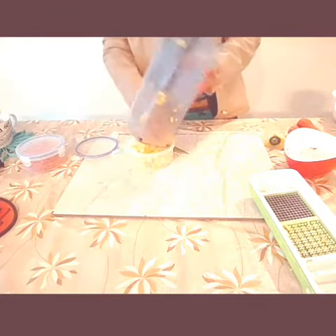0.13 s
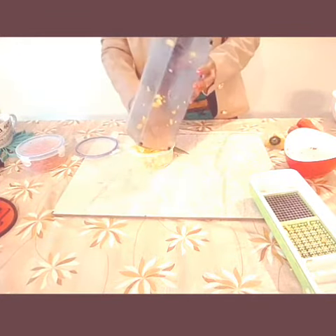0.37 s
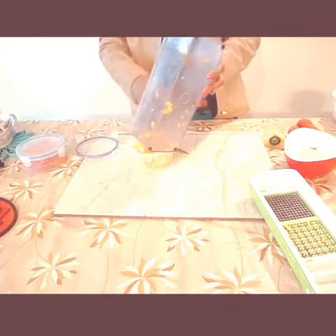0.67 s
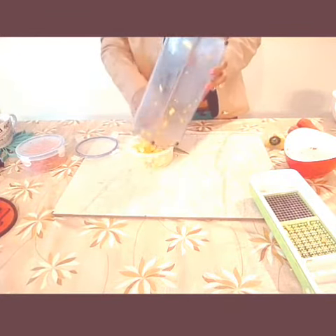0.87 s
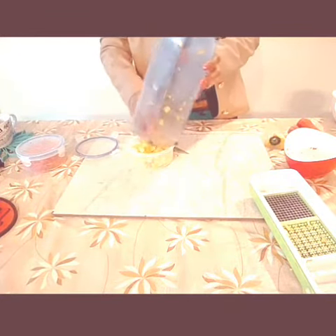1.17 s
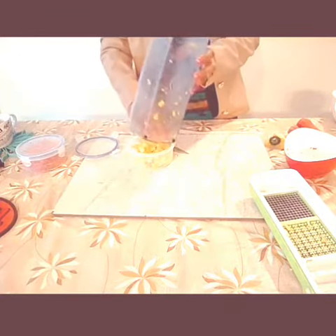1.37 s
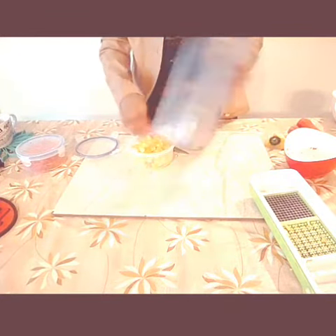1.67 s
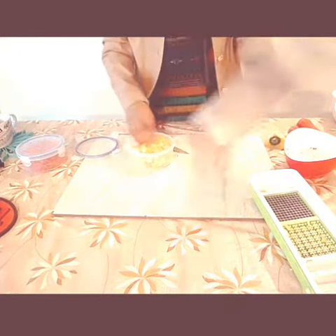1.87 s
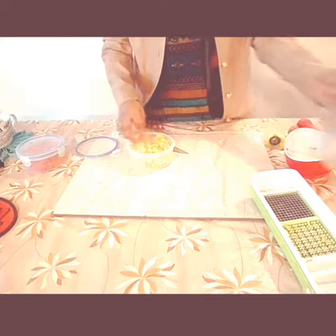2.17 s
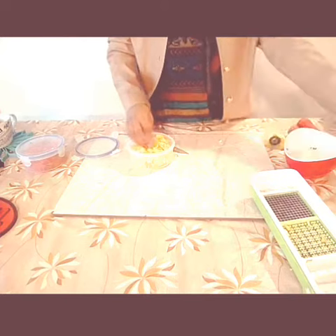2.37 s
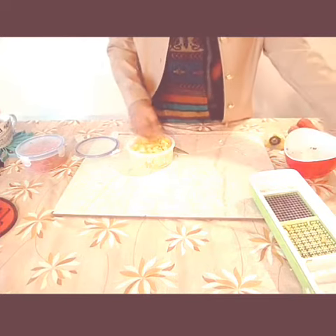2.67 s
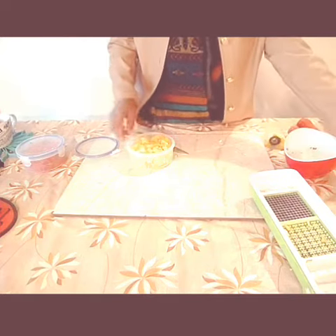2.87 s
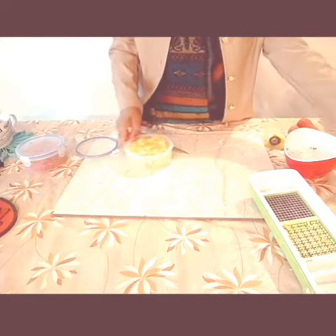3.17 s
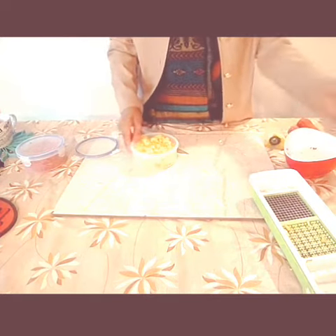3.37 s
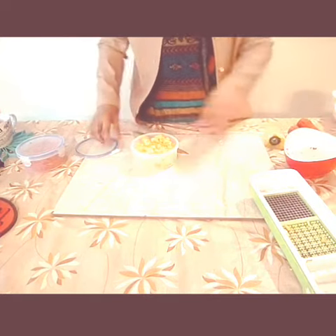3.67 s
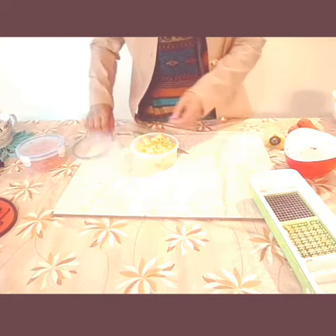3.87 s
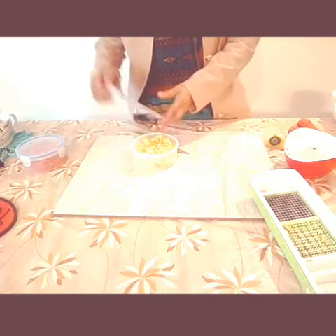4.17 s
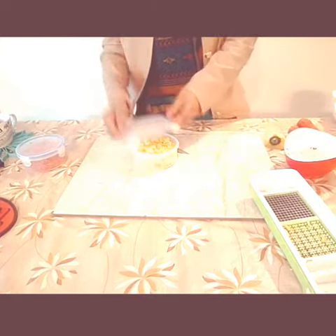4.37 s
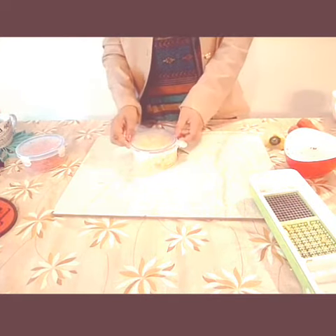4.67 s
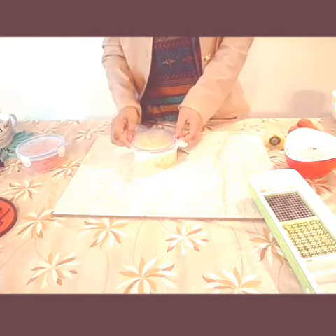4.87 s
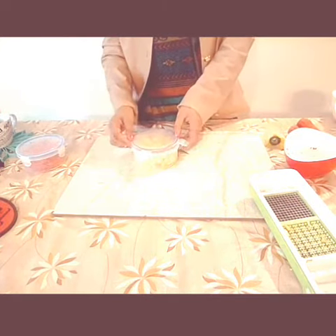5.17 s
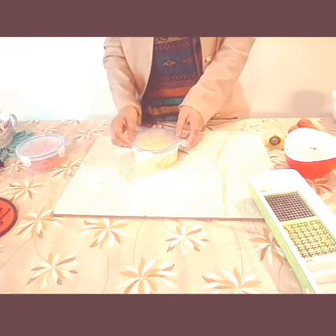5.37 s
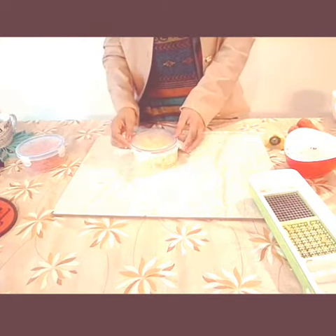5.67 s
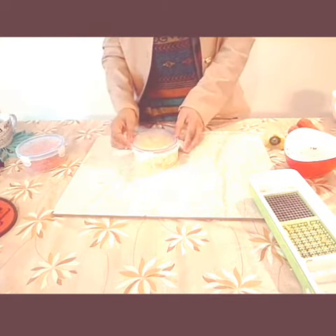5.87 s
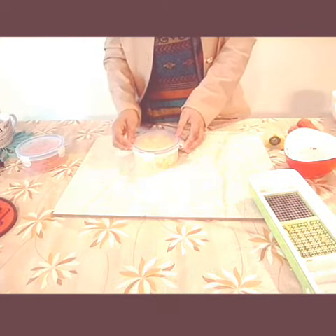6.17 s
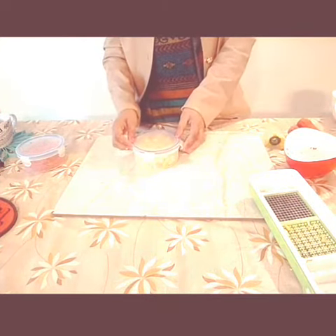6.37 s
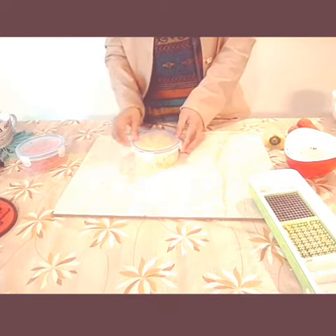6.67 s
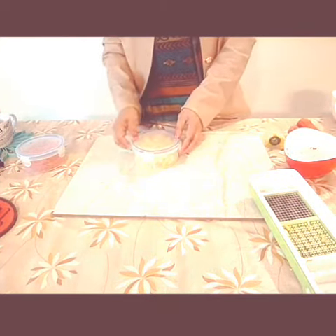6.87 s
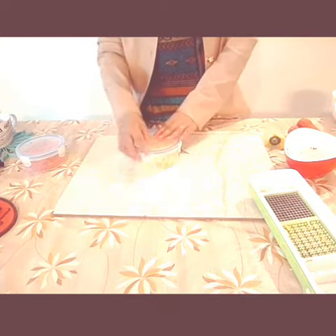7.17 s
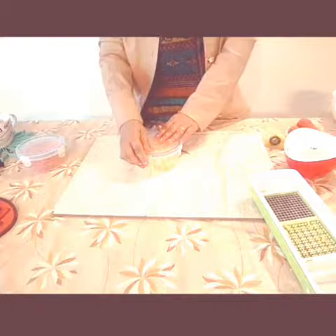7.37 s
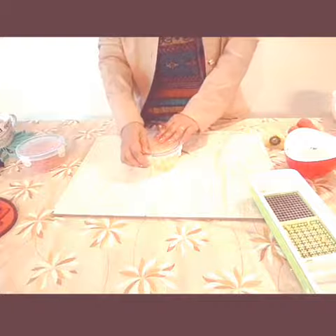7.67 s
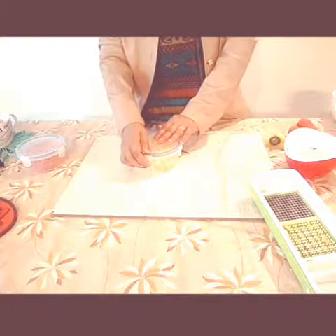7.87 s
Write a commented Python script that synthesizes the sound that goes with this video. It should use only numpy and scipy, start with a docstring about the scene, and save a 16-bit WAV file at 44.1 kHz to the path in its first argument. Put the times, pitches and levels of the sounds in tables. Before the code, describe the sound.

Steady hiss and faint hum. A hollow plastic knock, then softer taps as chopped food is emptied; a low bump and a quick clattering set-down follow. Lid knocks, finger rubs and thin faint rings lead to bright, sharp latch snaps, the loudest sounds. Close microphone, lively small kitchen, distant crow and one tiny bird chirp.

```python
"""Over steady hum and hiss, hands knock a plastic tray empty over a small tub, set it aside, seat a lid, snap latches.
The place is a bare kitchen, the microphone some 0.6 m from the hands: each blow is a short contact that rings
a few damped modes, answered by echoes and a noise tail from the walls. Slipping food and fingers are dense tiny
impulses; thin rings are trembling single modes. Far outside a crow caws (harmonics and noise through a throat)
and a small bird chirps (a wandering whistle mixed with narrow noise)."""
import sys
import numpy as np
from scipy import signal
from scipy.io import wavfile
from scipy.ndimage import uniform_filter1d

SR = 44100
rng = np.random.default_rng(int(sys.argv[2]) if len(sys.argv) > 2 else 0)


def materialize(psi):
    """Save the field psi as 16-bit PCM at rate SR to the path in sys.argv[1].

    A 1-D psi becomes a single channel; in a 2-D psi each row is a channel.
    """
    bounded = np.clip(np.atleast_2d(psi).T, -1, 1)
    quanta = np.round(bounded * 32767).astype(np.int16)
    wavfile.write(sys.argv[1], SR, quanta)


N = 353329

# Levels of sources are given ahead of the kitchen, the microphone and the mix in scene().
# Hiss spectrum, only its shape counts: (f/Hz, density/dB per Hz)
HISS_SPECTRUM = [(15, -43), (25, -7), (39, -14.5), (124, 6), (232, -10.5), (304, -0.5), (422, -9.5),
                 (669, -11), (1640, -14.5), (1980, -17), (5880, -20), (8370, -33.5), (13300, -34.5),
                 (14800, -27), (15600, -23.5), (15900, -77)]
HISS_DB = -65.5  # RMS
HUM_HZ, HUM_WIDTH_HZ, HUM_DB = 312.5, 36, -70.5  # RMS
# Kitchen reverberation: (f/Hz, t60/s)
WALL_DECAY = [(100, 0.44), (260, 0.58), (700, 0.48), (1840, 0.53), (4850, 0.47), (12800, 0.34)]
# First reflections, against a tail of unit energy: (t/ms, level/dB)
FIRST_ECHOES = [(2.5, -12.5), (5.5, -10), (9.5, -7.5), (12, -8), (17, -15), (24, -23.5)]
TRAVEL_S = .0018  # from the hands to the microphone
BASS_DB_PER_OCTAVE = -5  # the lower the struck spot rings, the more bass the blow carries

# Blows, five tables: (t/s, peak level/dB, favoured f/Hz, treble/dB, walls/dB)
# Hand taps on the tray
TRAY_TAPS = [(0.134, -23.5, 636, -10, 1.9), (0.733, -48.5, 465, -1.5, 5.5), (0.952, -32, 600, -18.5, 8),
             (1.085, -42.5, 1220, -44, 4.5), (1.15, -41.5, 1100, -31, 1), (1.277, -33.5, 556, -4, 1.5),
             (1.399, -44, 590, 6, 6.5), (1.488, -51.5, 1110, -15, 1.5)]
# A dull bump on the table
TABLE_THUMPS = [(0.77, -50.5, 150, -30, -1), (2.829, -36, 300, -28, -4), (2.843, -28.5, 113, -33, 1)]
# The tray meets the shelf
TRAY_SET_DOWN = [(3.17, -43, 900, -19, -5), (3.178, -16.5, 1280, -5.5, 0.5), (3.3505, -21, 3120, 3, 1.5),
                 (3.361, -16.5, 1360, -12.5, 5), (3.3658, -12, 1770, 2, -5)]
# The lid is lifted and seated
LID_TAPS = [(3.766, -39, 1900, -9.5, 0), (3.988, -39.5, 1240, -1, 7), (4.509, -13.5, 1090, -5.5, -1.5),
            (4.682, -15, 940, -10, -4.5), (4.927, -36, 1120, -10, -3.5), (4.959, -39, 425, -6.5, 5),
            (5.133, -37.5, 300, -9.5, -6), (5.177, -44.5, 790, -9.5, 9.5), (5.455, -46, 294, -6, 6),
            (5.489, -18.5, 642, -9.5, -4), (5.934, -41.5, 780, -30, 0), (5.947, -24.5, 1590, -9.5, -1.9),
            (5.964, -25.5, 627, -22, -4.5), (6.091, -35.5, 680, -14, -1), (6.142, -31, 280, -29, -2),
            (6.2915, -47, 393, -8.5, -6)]
# Latches creak and snap
LATCH_SNAPS = [(6.654, -40.5, 1530, -13, -3), (6.694, -29.5, 1800, 0.5, -3), (6.759, -9.5, 6380, -4, 4),
               (6.768, 0.3, 6460, 5.5, -3), (7.347, -43, 1840, -7, -4.5), (7.684, -27.5, 4040, -1.5, -13),
               (7.6945, -6.5, 3860, 14, -15), (7.705, -1.6, 6600, 2, 0.2), (7.788, -5.7, 6550, 1.5, 5)]

# Damped modes of the struck things, five tables: (f/Hz, width/Hz, level/dB)
# Plastic tray
TRAY_MODES = [(394, 37, -1), (540, 16, 3), (620, 53, -0.5), (811, 140, -2.5), (1100, 105, -2.5),
              (1343, 90, -7), (1610, 67, -7), (2112, 63, -5.5), (2400, 35, -11), (3000, 1600, -18.5),
              (3900, 1500, -17), (5260, 4100, -28.5)]
# Table
TABLE_MODES = [(113, 7, 10.5), (151, 81, 6.5), (300, 78, -9), (500, 26, -9)]
# Shelf
SHELF_MODES = [(131, 160, 4), (455, 134, -2.5), (920, 210, -4), (1220, 170, -11.5), (1940, 460, -10),
               (2700, 1150, -12.5), (4580, 1100, -20)]
# Lid
LID_MODES = [(321, 27, -2), (567, 87, -3), (850, 49, -3), (1114, 560, 1), (1643, 120, 1),
             (2700, 1430, -3.5), (4300, 680, -4), (6340, 1900, -31)]
# Latches
LATCH_MODES = [(300, 200, -10), (800, 330, -22), (2020, 530, 12.5), (2676, 1000, 12), (4700, 2500, 5.5),
               (9160, 2040, -3.5), (15000, 1000, -8.5)]

# Diced food tumbling down the tray: (t/s, length/s, level/dB)
FOOD_TUMBLES = [(0.48, 0.069, -71), (1.003, 0.33, -68.5), (1.45, 0.074, -69.5)]
# Caws outside: (t/s, level/dB, rasp against voice/dB)
CAWS = [(1.639, -70, -10), (2.09, -71.5, -9), (2.58, -67.5, -8), (3.011, -69.5, -7.5), (3.53, -66.5, -10.5),
        (4.1, -67.5, -10), (7.2, -70, -14)]
# Crow's throat, voiced part: (f/Hz, width/Hz, level/dB)
THROAT = [(1532, 110, 0.5), (1620, 490, 1), (1930, 480, -10)]
# Crow's upper throat, rasp: (f/Hz, width/Hz, level/dB)
UPPER_THROAT = [(4550, 340, 1), (5390, 2400, 10)]
CAW_S, CAW_HZ = .28, 458  # length; top of the pitch arch
# Chirps smeared by distance: (t/s, length/s, level/dB, f/Hz, width/Hz)
CHIRPS = [(2.395, 0.15, -74, 3660, 336)]
# Fingers and food sliding on plastic: (t/s, length/s, level/dB)
SLIDE_STROKES = [(3.534, 0.41, -70.5), (3.976, 0.051, -59), (4.906, 0.09, -58), (5.093, 0.12, -64),
                 (5.24, 0.16, -74.5), (5.924, 0.084, -56.5), (6.08, 0.056, -61), (6.676, 0.19, -62),
                 (7.125, 0.32, -71)]
# Sliding spectrum, only its shape counts: (f/Hz, density/dB per Hz)
SLIDE_SPECTRUM = [(120, -12.5), (200, -11), (640, -15.5), (774, -12), (1830, -10.5), (2180, -30.5),
                  (2810, -13.5), (5670, -20), (9000, -39), (11700, -71.5), (19800, -120)]
SLIDE_TILT_DB = -5.5  # at 3500 Hz, mirrored at 500 Hz
# Thin wavering rings, of the lid and perhaps a bracelet: (t/s, level before decay/dB, f/Hz, t60/s)
TINKLE_RINGS = [(3.69, -66, 3420, 0.4), (3.779, -64.5, 2400, 1.8), (3.988, -46.5, 1190, 0.43),
                (4.99, -65, 3580, 0.99), (5.03, -66, 2777, 1.9), (5.088, -69, 4153, 0.81),
                (5.63, -71.5, 2700, 0.46), (5.96, -66, 1570, 0.52)]

# Microphone response: (f/Hz, level/dB)
MICROPHONE = [(30, -16), (70, -2), (150, -6.5), (4000, 1.5), (6400, 5.5), (7600, -4), (10000, -6.5),
              (13500, -14), (15000, -4.5), (16500, -15)]
LIMIT_DB, SQUEEZE = -24.5, 0.51  # gain control threshold; dB taken off per dB above it
HELD_LEVEL_FALL_DB_PER_S = 110.5
EDGE_HZ = 17000  # band limit


def amp(db):
    """Amplitude factor for a level in dB."""
    return 10 ** (np.asarray(db) / 20)


def evened(x):
    """The same signal at unit RMS."""
    return x / np.sqrt(np.mean(x ** 2) + 1e-20)


def read(points, hz):
    """Curve through (f, value) points, straight over log frequency and level past its ends."""
    f, value = np.transpose(points)
    return np.interp(np.log(hz + 1), np.log(f + 1), value)


def add(mix, s, sound):
    """Lay a sound into the mix at s seconds, cut at the mix's end."""
    part = mix[round(s * SR):][:len(sound)]
    part += sound[:len(part)]


def resonate(x, modes):
    """Sum of damped resonances that start from rest, each with its dB at its centre."""
    out = np.zeros(len(x))
    for hz, width, db in modes:
        r = np.exp(-np.pi * width / SR)
        pole = r * np.exp(2j * np.pi * hz / SR)
        out += amp(db) * 2 * signal.lfilter([1 - r], [1, -pole], x).imag
    return out


def causal(points, size=4096):
    """Minimum-phase impulse response with the given dB curve."""
    log_gain = np.log(amp(read(points, abs(np.fft.fftfreq(size, 1 / SR)))))
    spectrum = np.exp(log_gain - 1j * signal.hilbert(log_gain).imag)
    return np.fft.ifft(spectrum).real[:size // 2]


def hum():
    """Noise through one narrow resonance: a tone that wavers in level."""
    return amp(HUM_DB) * evened(resonate(rng.standard_normal(N), [(HUM_HZ, HUM_WIDTH_HZ, 0)]))


def hiss():
    """Random short-time spectra whose level drifts in slow patches below 7 kHz."""
    frames, hz = N // 256 + 5, np.fft.rfftfreq(1024, 1 / SR)
    real, imag, patches = rng.standard_normal((frames, 513, 3)).T
    patches = uniform_filter1d(patches, 16, axis=0)  # over frequency
    patches = evened(uniform_filter1d(patches, 30, axis=1))  # over time
    level_db = read(HISS_SPECTRUM, hz)[:, None] + 2.2 * patches * (hz < 7000)[:, None]
    noise = signal.istft((real + 1j * imag) * amp(level_db), nperseg=1024, noverlap=768)[1][:N]
    return amp(HISS_DB) * evened(noise)


def walls():
    """One path through the kitchen: a few echoes, then sparse taps whose bands die at their own speed."""
    taps = np.zeros(SR)
    at = np.arange(0, SR - 16, 16) + rng.integers(0, 16, (SR - 1) // 16)
    taps[at] = rng.choice([-1., 1.], len(at))
    hz, t, z = signal.stft(taps, SR, nperseg=256)
    decay_db = -60 * t / read(WALL_DECAY, hz)[:, None]
    tail = signal.istft(z * amp(decay_db), SR, nperseg=256)[1][:SR]
    tail *= np.clip((np.arange(SR) / SR - .005) / 0.0098, 0, 1)  # builds up from 5 ms on
    tail /= np.linalg.norm(tail)
    for ms, db in FIRST_ECHOES:
        scatter = rng.standard_normal(160) * np.hanning(160)  # cluttered surfaces smear each echo
        add(tail, ms / 1000, amp(db) * scatter / np.linalg.norm(scatter))
    # low-pass of the echoes and tail near 15.7 kHz
    return signal.fftconvolve(tail, causal([(15500, 0), (15900, -40)]))


def blows(table, modes, paths, contact_ms, chatter_share, body_db, near_db):
    """A push rings the modes, most those near the struck spot; lower spots carry more bass, treble is set per blow."""
    out, t = np.zeros(N), np.arange(8192) / SR
    mode_ring = resonate(1. * (t == 0), modes)
    near = causal([(120, near_db), (450, 0)])  # bass on the straight path
    t_contact = t[:1024]
    contact = np.exp(-((t_contact - .0006) * 1000 / contact_ms) ** 2)
    for k, (s, db, hz, treble_db, walls_db) in enumerate(table):
        bass_db = body_db + BASS_DB_PER_OCTAVE * np.log2(hz / 1000)
        tilt = causal([(40, bass_db - 30.5), (100, bass_db - 7.5), (300, bass_db), (1100, 0.015),
                       (4000, treble_db), (12000, 1.93 * treble_db + 5.0)])
        spot = causal([(hz / 1.224, 0), (hz, 9), (hz * 1.22, 0)])
        ring = signal.fftconvolve(signal.fftconvolve(mode_ring, tilt), spot)[:len(t)]
        ring *= amp(db) / abs(ring).max()
        # the surfaces chatter while they touch
        chatter = rng.standard_normal(1024) * (rng.random(1024) < .15) * contact
        push = chatter_share * chatter + signal.unit_impulse(1024, 26)
        straight = signal.fftconvolve(signal.fftconvolve(ring, near), push)
        add(out, s + TRAVEL_S, straight)
        reflected = signal.fftconvolve(ring, paths[k % len(paths)])
        add(out, s + TRAVEL_S, amp(walls_db) * reflected)
    return out


def tray_taps(paths):
    """Hands on the plastic tray: long contact, ringing narrow modes."""
    return blows(TRAY_TAPS, TRAY_MODES, paths, contact_ms=9, chatter_share=0.2354, body_db=-8, near_db=-13)


def tumbles():
    """Diced food: sparse soft pats of uneven size ring the tray."""
    sizes = amp(1.7 * np.minimum(rng.exponential(1, N), 3))
    pats = sizes * (rng.random(N) < 150 / SR)  # about 150 pats per second
    soft = causal([(500, 0), (1100, 7.5), (2500, -7.5)])
    pats = evened(signal.oaconvolve(resonate(pats, TRAY_MODES), soft)[:N])
    out = np.zeros(N)
    for s, length, db in FOOD_TUMBLES:
        burst = pats[round(s * SR):][:round(length * SR)]
        add(out, s, amp(db) * burst * signal.windows.tukey(len(burst), .3))
    return out


def thumps(paths):
    """Dull bumps ring the low modes of the table."""
    return blows(TABLE_THUMPS, TABLE_MODES, paths, contact_ms=6.5, chatter_share=0.3, body_db=4, near_db=2.5)


def crow():
    """Hoarse pulses on an arched pitch, mixed with noise, through the throat."""
    out = np.zeros(N)
    arch = np.sin(np.linspace(0, np.pi, round(CAW_S * SR)))
    for s, db, rasp_db in CAWS:
        wobble = evened(uniform_filter1d(rng.standard_normal(SR), 600))[:len(arch)]
        turns = np.cumsum(CAW_HZ * (.96 + .04 * arch + .016 * wobble)) / SR
        folds = sum(np.cos(2 * np.pi * k * turns) for k in range(3, 14))  # harmonics 3 to 13
        drive = .6 * evened(folds) + rng.standard_normal(len(folds))
        voice = evened(resonate(resonate(drive, THROAT), THROAT))
        rasp = evened(resonate(resonate(drive, UPPER_THROAT), UPPER_THROAT))
        add(out, s, amp(db) * (voice + amp(rasp_db) * rasp) * arch ** .7)
    return out


def small_birds():
    """Each chirp is a whistle that wanders fast in pitch, mixed with noise in the same band."""
    out = np.zeros(N)
    for s, length, db, hz, width in CHIRPS:
        wander, fuzz = rng.standard_normal((2, SR // 2))
        wander = evened(uniform_filter1d(uniform_filter1d(wander, 500), 500))
        whistle = np.sin(2 * np.pi * np.cumsum(hz + 0.84 * width * wander) / SR)
        band = [(hz, width, 0)]
        chirp = .45 * whistle + evened(resonate(resonate(fuzz, band), band))
        size = round(length * SR)
        add(out, s, amp(db) * chirp[:size] * signal.windows.tukey(size, .7))
    return out


def set_down(paths):
    """The tray meets the shelf, whose broad modes die fast."""
    return blows(TRAY_SET_DOWN, SHELF_MODES, paths, contact_ms=5, chatter_share=0.36, body_db=-0.5, near_db=-9)


def slides():
    """Fingers and food on plastic: dense tiny slips of uneven size under each stroke."""
    sizes = amp(2.5 * np.minimum(rng.exponential(1, N), 4))
    slips = rng.choice([-1, 1], N) * sizes * (rng.random(N) < 4000 / SR)  # about 4000 per second
    slips = evened(signal.oaconvolve(slips, causal(SLIDE_SPECTRUM))[:N])
    tilt = causal([(500, -SLIDE_TILT_DB), (3500, SLIDE_TILT_DB)])
    out = np.zeros(N)
    for s, length, db in SLIDE_STROKES:
        stroke = slips[round(s * SR):][:round(length * SR)]
        stroke = stroke * signal.windows.tukey(len(stroke), .5)
        add(out, s, amp(db) * signal.fftconvolve(stroke, tilt))
    return out


def tinkles():
    """Single thin modes, kept trembling by the moving hand; each lasts a second at most."""
    out, t = np.zeros(N), np.arange(SR) / SR
    for s, db, hz, t60 in TINKLE_RINGS:
        tremble = evened(resonate(rng.standard_normal(SR), [(hz, 35, 0)]))
        tone = 0.25 * np.sin(2 * np.pi * hz * t) + 0.5 * tremble
        onset = np.minimum(t / 0.0069, 1)
        add(out, s, amp(db - 60 * t / t60) * onset * tone)
    return out


def lid_taps(paths):
    """The lid is lifted and seated: short contacts ring narrow and broad modes."""
    return blows(LID_TAPS, LID_MODES, paths, contact_ms=4, chatter_share=0.2671, body_db=-1, near_db=-8.5)


def latches(paths):
    """Latches creak and snap: the shortest contacts, bright broad modes."""
    return blows(LATCH_SNAPS, LATCH_MODES, paths, contact_ms=0.93, chatter_share=0.3, body_db=15.5, near_db=-10)


def scene():
    """Blows near the microphone, with the faint sounds straight and through one kitchen path."""
    paths = [walls() for _ in range(5)]
    knocks = tray_taps(paths) + thumps(paths) + set_down(paths) + lid_taps(paths) + latches(paths)
    faint = tumbles() + crow() + small_birds() + slides() + tinkles()
    reflected = signal.fftconvolve(faint, paths[0])[:N]
    return (knocks + amp(6.0) * faint + amp(-3.0) * reflected)[None]


def record(dry):
    """A microphone that peaks near 6 kHz, gain control that ducks just after loud snaps, hum, hiss, band limit."""
    heard = signal.oaconvolve(dry, causal(MICROPHONE)[None])[:, :N]
    average = np.ones(128) / 128  # 3 ms
    power_db = 10 * np.log10(signal.lfilter(average, 1, heard ** 2) + 1e-12)
    # the held level jumps up with peaks and falls at a steady rate
    climb = np.arange(N) * HELD_LEVEL_FALL_DB_PER_S / SR
    held_db = np.maximum.accumulate(power_db + climb, axis=1) - climb
    over_db = np.maximum(held_db - LIMIT_DB, 0)
    heard = heard / amp(SQUEEZE * signal.lfilter(average, 1, over_db))
    heard = heard + hiss() + hum()
    band_limit = signal.firwin(511, EDGE_HZ, window=("kaiser", 9), fs=SR)
    return signal.oaconvolve(heard, band_limit[None], "same")


dry = scene()
out = record(dry)
materialize(out)
```